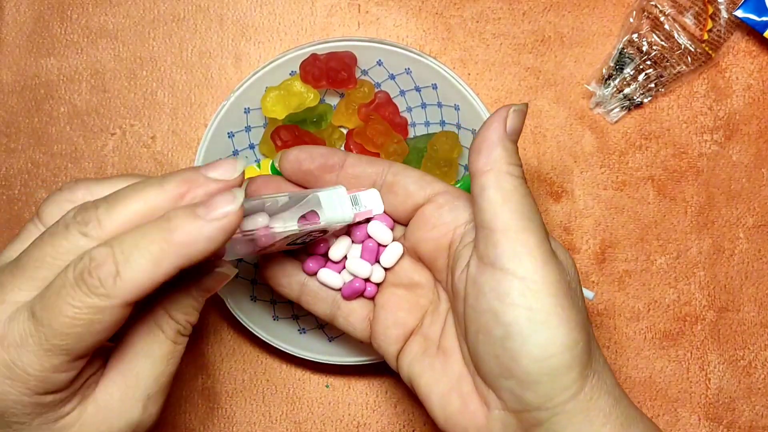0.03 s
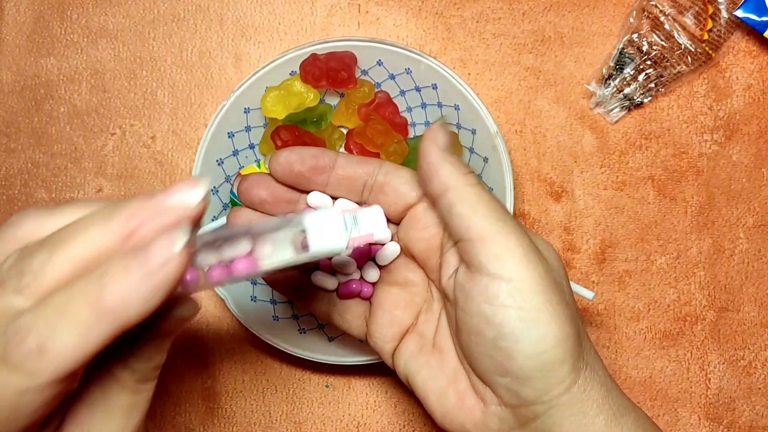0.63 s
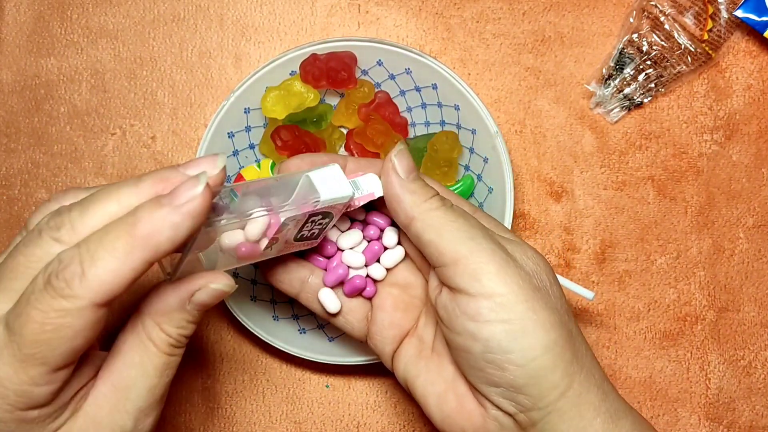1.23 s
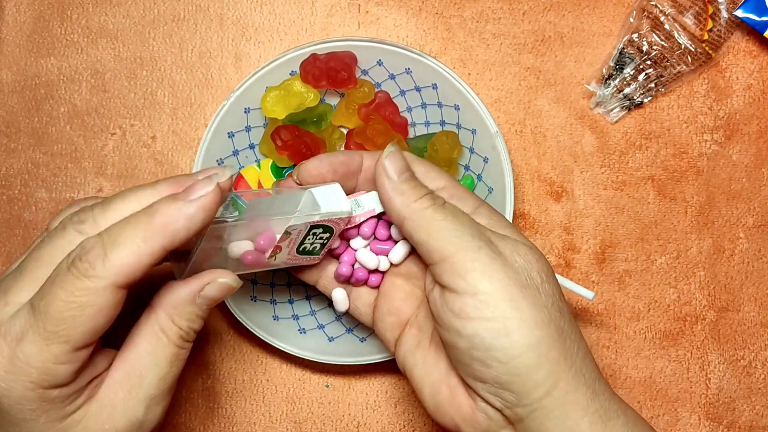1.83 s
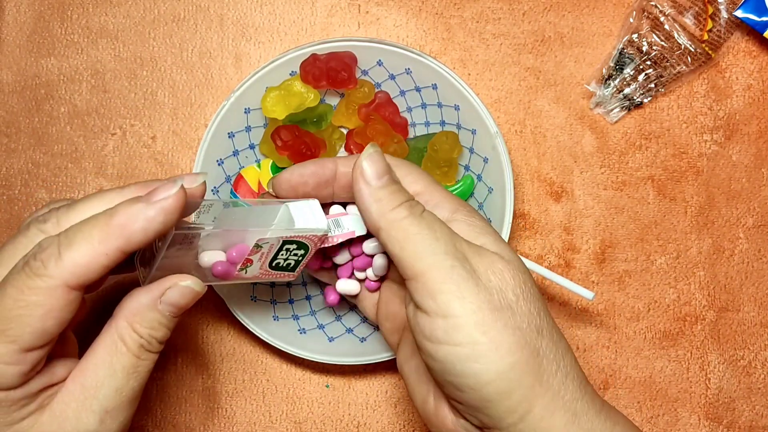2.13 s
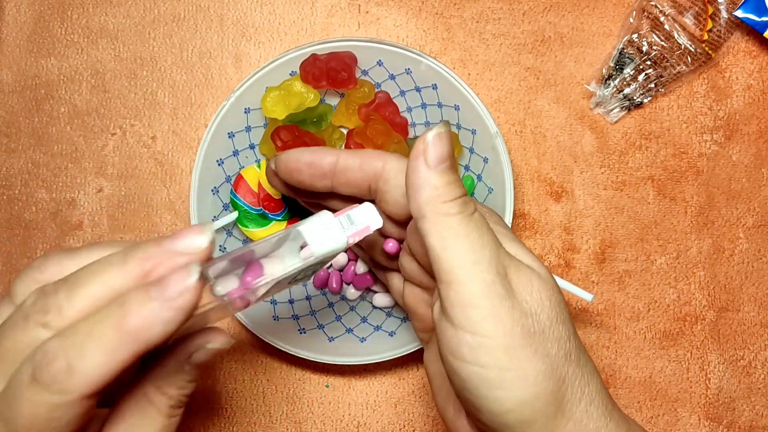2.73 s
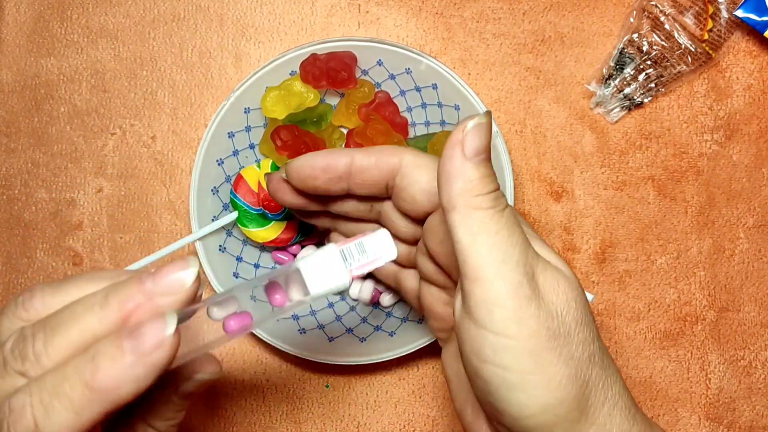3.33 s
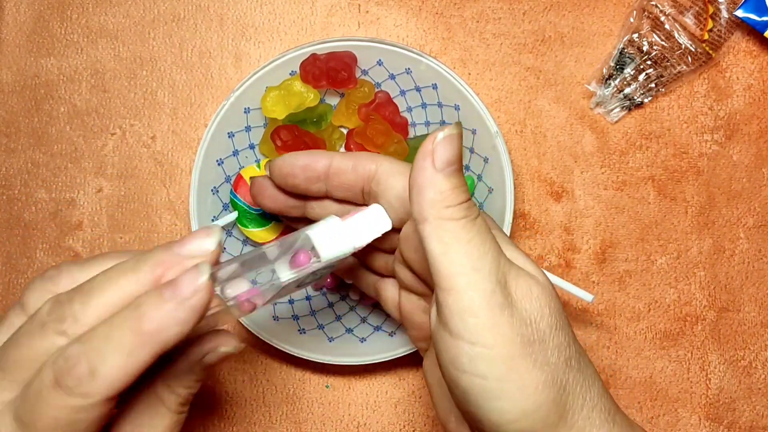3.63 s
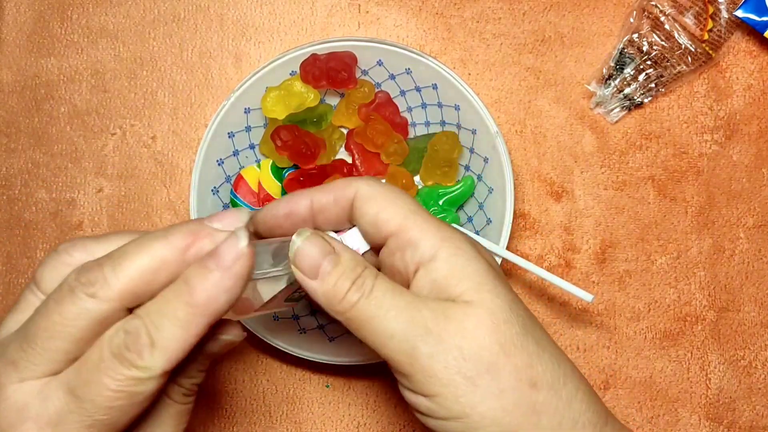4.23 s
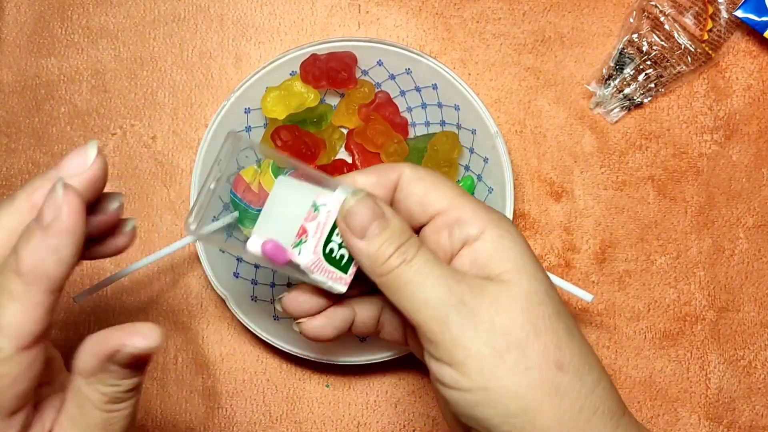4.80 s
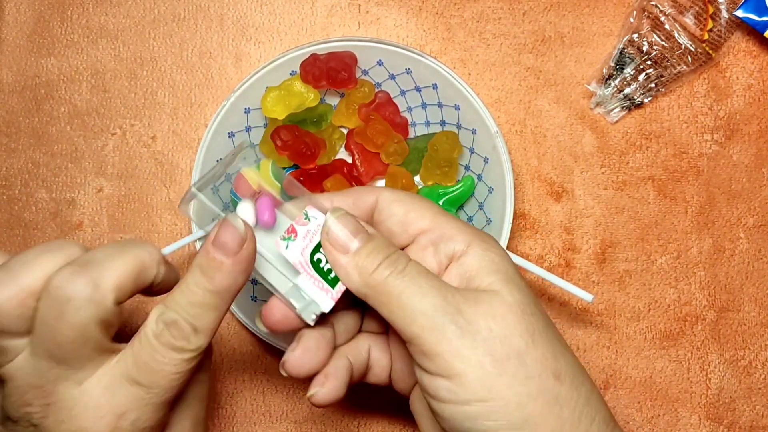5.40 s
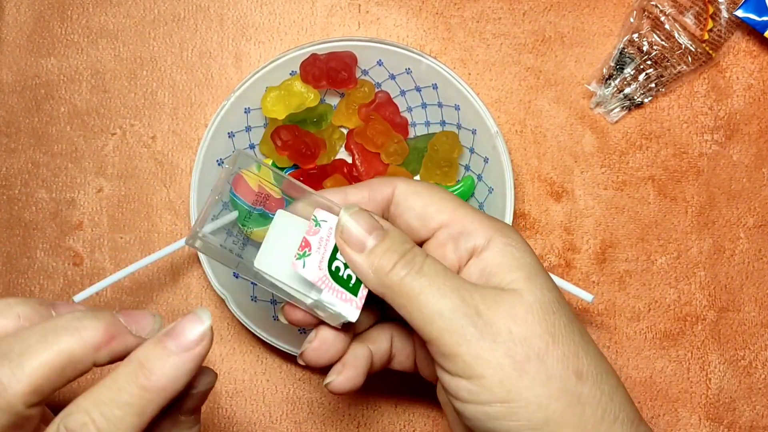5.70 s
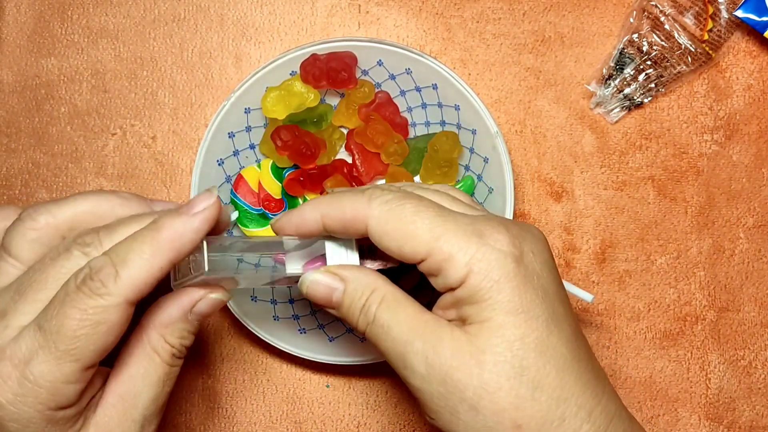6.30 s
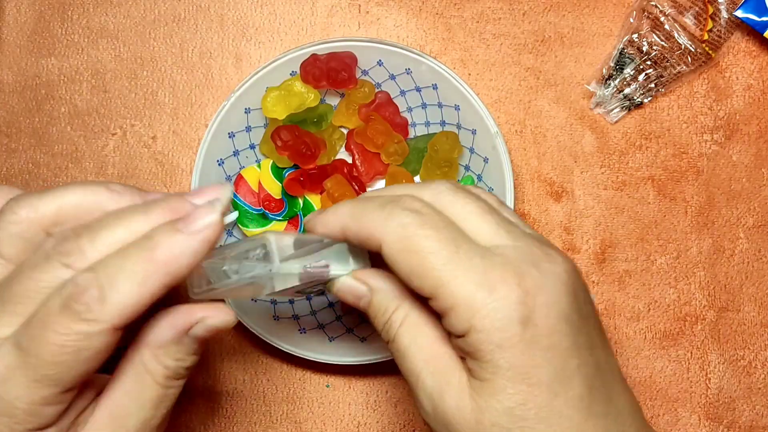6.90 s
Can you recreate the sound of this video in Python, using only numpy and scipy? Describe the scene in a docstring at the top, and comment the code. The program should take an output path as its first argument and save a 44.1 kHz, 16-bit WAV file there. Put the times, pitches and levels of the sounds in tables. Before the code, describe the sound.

For the first two seconds, small hard candies click and rattle in a thin plastic box, shaken in uneven bursts with hollow knocks and a few light, dry ticks. At about 2 seconds, candies start landing on a china plate, each with a bright tick and a very short ring. They thicken into a tumbling pour from 2.3 seconds that thins out by 2.9. From 3 to 4.7 seconds, more rattles and knocks in the box alternate with single drops on the plate. After a lull with one faint click and soft finger bumps, a sharp hollow knock comes at 5.5 seconds, followed by lighter rattling that fades by 6.4. Around 6.6 seconds, a last candy hits the plate and bounces with quick, softer ticks. The sound is close, bright and in stereo, in a small quiet room with faint hiss and hum.

```python
"""Candies from box to plate

Small hard candies are shaken from a thin plastic box into a palm, then poured onto a china plate.
In the box each clicks, bounces and knocks the hollow shell; on the plate they tick and ring the china.
The last few drop one by one. Close stereo microphone with a bright top, small quiet room."""
import sys
import numpy as np
from scipy import signal
from scipy.fft import rfft, irfft
from scipy.io import wavfile
from scipy.ndimage import uniform_filter1d

SR = 44100
rng = np.random.default_rng(int(sys.argv[2]) if len(sys.argv) > 2 else 0)


def int16_out(signal):
    """Quantize to a 16-bit WAV file."""
    q = np.round(np.clip(np.atleast_2d(signal).T, -1, 1) * 32767)
    wavfile.write(sys.argv[1], SR, q.astype(np.int16))


N = 315315
HIT_SAMPLES, ATTACK_SAMPLES = 4096, 265
TIME_S, AGE_S = np.arange(N) / SR, np.arange(HIT_SAMPLES) / SR
BOX_PAN_DB, PLATE_PAN_DB, PAN_VARY_DB = 0.5, -2.5, 1.5  # left minus right


def undb(db):
    """Decibels to gain."""
    return 10 ** (np.asarray(db) / 20)


def decay(t60_s):
    """Exponential decay, one hit long."""
    return np.exp(-np.log(1000) * AGE_S / t60_s)


def unit_rms(x, samples=None):
    """Scale to rms 1 over the leading samples, by default all."""
    return x / np.sqrt(np.mean(x[..., :samples] ** 2))


def tint(x, curve, size=1024):
    """Minimum-phase filter through (freq_hz, gain_db) points."""
    hz, db = np.transpose(curve)
    grid_hz = np.maximum(np.arange(size // 2 + 1) * SR / size, 1)
    gain = undb(np.interp(np.log(grid_hz), np.log(hz), db))
    cepstrum = irfft(np.log(gain))
    cepstrum[1:size // 2] *= 2
    cepstrum[size // 2 + 1:] = 0
    response = irfft(np.exp(rfft(cepstrum)))
    return signal.fftconvolve(x, response[None], axes=1)[:, :x.shape[1]]


def stereo_noise(samples, width):
    """Common noise plus each side's own, weighted by width."""
    noise = rng.standard_normal((3, samples))
    return noise[0] + width * noise[1:]


def add(out, start_s, sound):
    """Mix a sound in at start_s."""
    start = max(int(start_s * SR), 0)
    out[:, start:start + sound.shape[1]] += sound[:, :max(out.shape[1] - start, 0)]


def pan(sound, pan_db, lag_samples=2):
    """Treble beams towards one capsule; the hands are slightly right, so the left lags."""
    gains = unit_rms(undb(np.array([[1], [-1]]) * np.clip(pan_db, -10, 10) / 2))
    left, right = sound * gains
    return np.array([np.roll(left, lag_samples), right])


def contact(spectrum, t60_s, width=0.89, vary_db=3, rise_s=0.00096):
    """Dense, heavily damped resonances, coloured anew by each spot struck."""
    colour = [(hz, db + vary_db * rng.standard_normal()) for hz, db in spectrum]
    burst = stereo_noise(HIT_SAMPLES, width) * decay(t60_s) * (1 - decay(rise_s))
    return tint(burst, colour)


def ring(modes, vary_db, detune, phase_vary_rad):
    """Modes whose shares depend on where the blow lands and which way they radiate."""
    out = 0
    for hz, db, t60_s in modes:
        share, shift, left, right = rng.standard_normal(4)
        phase = 2 * np.pi * hz * (1 + detune * shift) * AGE_S
        phase = phase + phase_vary_rad * np.array([[left], [right]])
        gain = rng.choice([-1, 1]) * undb(db + vary_db * share)
        out = out + gain * np.sin(phase) * decay(t60_s)
    return out * (1 - decay(0.0039))


def bounces(spacing_s, loss_db, count):
    """An oval candy lands, then rebounds more softly: (delay_s, gain) per touch."""
    delays_s = np.cumsum(spacing_s * rng.uniform(.3, 1.3, count))
    gains = undb(loss_db * (1 + np.arange(count) / 2)) * rng.uniform(0.27, 1.6, count)
    return [(0.000042, 1)] + list(zip(delays_s, gains))


def strike(sound, touches):
    """A response repeated at each touch; attack rms 1."""
    out = np.zeros((2, HIT_SAMPLES))
    for delay_s, gain in touches:
        add(out, delay_s, gain * sound)
    return unit_rms(out, ATTACK_SAMPLES)


def impacts(rate_per_s, spread_db):
    """Random impulses of unequal size, slightly different on each side."""
    size = undb(spread_db * np.minimum(rng.exponential(size=N), 3))
    return (rng.random(N) < rate_per_s / SR) * size * stereo_noise(N, 0.51)


# Noise floor: freq_hz, gain_db
FLOOR_SPECTRUM = [(20, 8), (55, 0.5), (95, -4.5), (140, -6), (200, -10.5), (400, -13), (1000, -19.5),
                  (2500, -24), (6000, -25.5), (9500, -19.5), (14000, -29.5)]
# Room hum: pitch_hz, level_db
HUM_TONES = [(49, -66), (129, -70), (344.5, -76)]

def background(floor_db=-56):
    """Low room rumble, microphone hiss and a faint hum."""
    floor = unit_rms(tint(stereo_noise(N, 1.0), FLOOR_SPECTRUM, size=8192))
    hum = sum(undb(db) * np.sqrt(2) * np.sin(2 * np.pi * hz * TIME_S) for hz, db in HUM_TONES)
    return undb(floor_db) * floor + hum


def room(x, t60_s=0.14, tail_db=-12.5, echo_s=0.008, echo_db=-21.5):
    """Direct sound, one near reflection and a short diffuse tail."""
    age_s = TIME_S[:2 * HIT_SAMPLES]
    envelope = np.exp(-np.log(1000) * age_s / t60_s) * np.minimum(age_s / 0.012, 1)
    tail = stereo_noise(len(age_s), 0.69) * envelope
    response = undb(tail_db) * tail / np.sqrt(np.sum(tail ** 2) / 2)
    echo = stereo_noise(HIT_SAMPLES, 0.62) * decay(0.018)
    add(response, echo_s, undb(echo_db) * echo / np.sqrt(np.sum(echo ** 2) / 2))
    return x + signal.fftconvolve(x, response, axes=1)[:, :N]


# Fingertip thud: freq_hz, gain_db
THUD_SPECTRUM = [(120, -10.5), (400, -10), (850, 0), (1300, -15), (2200, -29.5), (12000, -17.5)]
# Bumps on the box: start_s, level_db
FINGER_TAPS = [(5.221, -39), (5.461, -29)]
# Slides on the plastic: middle_s, length_s, centre_hz, level_db
FINGER_RUBS = [(4.326, 0.04, 9760, -49.5), (4.389, 0.035, 790, -56)]

def fingers():
    """Fingertips bump the box dully or rub softly along it."""
    out = np.zeros((2, N))
    for start_s, db in FINGER_TAPS:
        thud = contact(THUD_SPECTRUM, t60_s=0.014, width=0.32, vary_db=0)
        add(out, start_s, undb(db) * unit_rms(thud, ATTACK_SAMPLES))
    for middle_s, length_s, hz, db in FINGER_RUBS:
        friction = unit_rms(tint(stereo_noise(N, 1.0), [(hz / 2, -18), (hz, 0), (hz * 2, -18)]))
        swell = np.exp(-(2 * (TIME_S - middle_s) / length_s) ** 2)
        out += undb(db) * friction * swell
    return out


# Hard tick: freq_hz, gain_db
TICK_SPECTRUM = [(500, -47.5), (1600, -21.5), (4500, -21), (6000, -9), (7200, -14), (9000, 4), (11500, 2),
                 (14000, -7.5)]

def candy_tick(t60_s, vary_db=3):
    """A candy meets a hard surface: a bright tick."""
    return contact(TICK_SPECTRUM, t60_s, vary_db=vary_db)


# Light candy ticks: start_s, level_db
LIGHT_TICKS = [(1.0605, -25.5), (1.4238, -29.5), (1.441, -27), (1.6823, -25.5), (1.8276, -19),
               (1.9123, -37.5), (2.091, -36), (3.8884, -25), (3.975, -25), (4.542, -25.5), (4.6187, -21.5),
               (4.738, -26), (6.6367, -26.5)]

def light_ticks():
    """Light dry candy ticks: on each other, on the box, or rebounding on the plate."""
    out = np.zeros((2, N))
    for start_s, db in LIGHT_TICKS:
        tick = candy_tick(t60_s=0.048)
        touches = bounces(spacing_s=0.004, loss_db=-17, count=3)
        add(out, start_s, undb(db) * strike(tick, touches))
    return out


# China resonances: pitch_hz, gain_db, unladen_t60_s
PLATE_MODES = [(1770, -30, .04), (3020, -25, .07), (3520, -25, .05), (4510, -28, .13), (5660, -15, .05),
               (6240, -21, .06), (8265, -11, .08), (8930, 0, .055), (9820, -9, .07), (10490, -8, .09),
               (10900, -9, .05), (11615, -2, .075), (12900, -8, .05), (13720, -9, .075)]

def china_ring(detune, damped_above_hz=4500, halvings_per_octave=0.51):
    """The plate rings; candies lying on it cut its high modes short."""
    modes = [(hz, db, t60_s * min(damped_above_hz / hz, 1) ** halvings_per_octave)
             for hz, db, t60_s in PLATE_MODES]
    return ring(modes, vary_db=1.0, detune=detune, phase_vary_rad=1.0)


# Single landings: start_s, level_db
PLATE_DROPS = [(2.0073, -11.5), (2.0565, -13.5), (2.104, -12), (2.1351, -18), (2.203, -13), (2.2496, -11),
               (2.286, -13), (2.3032, -13), (2.344, -19), (2.3678, -15.5), (2.5687, -14.5), (2.728, -15),
               (2.7726, -16.5), (3.1064, -14.5), (3.1756, -22), (3.212, -15), (3.4494, -11.5),
               (3.4695, -15), (3.771, -12), (3.8351, -14), (3.9176, -14.5), (4.463, -11), (4.558, -15),
               (6.5963, -13.5), (6.66, -16.5), (6.6825, -23.5), (6.7057, -19), (6.727, -28),
               (6.7493, -25.5)]

def plate_drops(ring_db=-3, ring_vary_db=4.5):
    """Tick, ring and soft rebounds; the ring varies as a candy meets bare china or other candies."""
    out = np.zeros((2, N))
    for start_s, db in PLATE_DROPS:
        spot, side = rng.standard_normal(2)
        tick = unit_rms(candy_tick(t60_s=0.02, vary_db=4.5), ATTACK_SAMPLES)
        chime = unit_rms(china_ring(detune=0.0022), ATTACK_SAMPLES)
        touches = bounces(spacing_s=.0075, loss_db=-11.5, count=3)
        landing = strike(tick + undb(ring_db + ring_vary_db * spot) * chime, touches)
        add(out, start_s, undb(db) * pan(landing, PLATE_PAN_DB + PAN_VARY_DB * side))
    return out


def pour_flow(start_s=2.31, rise_s=.04, thin_after_s=0.27, thin_db_per_s=-51, end_s=2.9, fall_s=.05):
    """Flow of the handful, 0-1: swells, holds, thins out, stops."""
    age_s = TIME_S - start_s
    moving = np.clip(age_s / rise_s, 0, 1) * np.clip((end_s - TIME_S) / fall_s, 0, 1)
    return moving * undb(thin_db_per_s * np.maximum(age_s - thin_after_s, 0))


def pour(level_db=-17.5, ring_db=1, spots=8, spot_rate_per_s=70):
    """Candies tumble over the plate; contacts grow fewer and softer as the flow dies."""
    flow, out = pour_flow(), np.zeros((2, N))
    for _ in range(spots):
        tick = unit_rms(candy_tick(t60_s=0.038))
        chime = undb(ring_db) * unit_rms(china_ring(detune=0.0016))
        landings = impacts(spot_rate_per_s * flow, spread_db=2.0)
        out += signal.oaconvolve(landings, tick + chime, axes=1)[:, :N]
    flow_rms = np.sqrt(np.mean(flow ** 2))
    return undb(level_db) * flow_rms * unit_rms(out * np.sqrt(flow))


# Shell resonances: pitch_hz, gain_db, t60_s
SHELL_MODES = [(1102, -12, 0.0073), (1167, -4.5, 0.026), (1279, 1, 0.02), (1430, 1, 0.011),
               (1650, -8, 0.012), (1908, -3, 0.01), (3280, -10.5, 0.034)]
# Air in the box, ringing lower as it empties: time_s, pitch_hz
CAVITY_PITCH = [(.8, 670), (1.5, 597), (3.6, 601), (5.5, 552)]

def shell_knock(time_s, vary_db=2.5, cavity_db=-11.5, cavity_t60_s=0.033):
    """Hollow knock of shell and enclosed air; so small a body radiates no bass."""
    cavity_hz = np.interp(time_s, *np.transpose(CAVITY_PITCH))
    modes = SHELL_MODES + [(cavity_hz, cavity_db, cavity_t60_s)]
    knock = ring(modes, vary_db, detune=0.023, phase_vary_rad=0.15)
    return signal.sosfilt(signal.butter(3, 470, "high", fs=SR, output="sos"), knock)


# Candy click and plastic wall clack: freq_hz, gain_db
CLICK_SPECTRUM = [(2000, -41.5), (5500, -15.5), (7000, -6.5), (8700, 2), (11000, -5.5), (12500, -9),
                  (14000, -12.5)]
CLACK_SPECTRUM = [(900, -38.5), (2200, -5), (3400, -1.5), (4800, 0), (6300, -3), (8500, -22)]

def box_blow(start_s, click_db, knock_db, clack_re_click_db=-9.5, clack_vary_db=0.96):
    """One blow clicks the candy, clacks the stiff wall and knocks the hollow shell."""
    wall, side = rng.standard_normal(2)
    touches = bounces(spacing_s=.0035, loss_db=-8.0, count=4)
    click = strike(contact(CLICK_SPECTRUM, t60_s=0.018, vary_db=2.5), touches)
    clack = strike(contact(CLACK_SPECTRUM, t60_s=0.023, width=0.66), touches)
    clack *= undb(clack_re_click_db + clack_vary_db * wall)
    snap = undb(click_db) * (click + clack)
    knock = undb(knock_db) * strike(shell_knock(start_s), touches)
    return pan(snap, BOX_PAN_DB + PAN_VARY_DB * side) + pan(knock, 0)


def jostling(blows, gain_db=-19, clack_db=-8, knock_db=-9, settle_t60_s=0.27, swell_s=0.034):
    """Each blow stirs the other candies, which scrape and nudge until they settle."""
    pushes = np.zeros(N)
    for start_s, click_db, _ in blows:
        pushes[int(start_s * SR)] += undb(click_db) ** 2
    retention = np.exp(-2 * np.log(1000) / (settle_t60_s * SR))
    energy = signal.lfilter([1], [1, -retention], pushes)
    stir = np.sqrt(np.abs(uniform_filter1d(energy, int(swell_s * SR))))
    nudges = impacts(rate_per_s=300, spread_db=8.5)
    knock = signal.fftconvolve(nudges, shell_knock(time_s=2.8, vary_db=0.5), axes=1)[:, :N]
    grit = stereo_noise(HIT_SAMPLES, 1.0) * decay(0.0081)
    scrape = signal.fftconvolve(nudges, grit, axes=1)[:, :N]
    click = unit_rms(tint(scrape, CLICK_SPECTRUM))
    clack = unit_rms(tint(scrape, CLACK_SPECTRUM))
    rattle = click + undb(clack_db) * clack + undb(knock_db) * unit_rms(knock)
    return pan(undb(gain_db) * stir * rattle, BOX_PAN_DB)


# Shakes sliding candies against the lid: start_s, length_s, knock_db
SHAKES = [(0.284, .032, -37), (0.432, 0.046, -35.5), (0.596, 0.023, -31.5), (0.688, 0.075, -36),
          (0.764, 0.02, -30.5), (1.164, 0.077, -45), (1.315, .045, -43.5), (1.526, 0.1, -34.5),
          (2.937, 0.038, -29), (3.112, 0.041, -44.5), (3.615, .08, -42.5), (5.529, 0.063, -35),
          (5.648, 0.06, -36), (5.967, 0.055, -49.5)]

def shake_blows(count=5, lead_s=.024, lead_db=-9.5, vary_db=2.5, jitter=.2, click_re_knock_db=3.5):
    """One candy runs ahead, then a few hit the lid in turn: (start_s, click_db, knock_db) per blow."""
    blows = []
    for start_s, length_s, db in SHAKES:
        lateness, softness = rng.standard_normal((2, count))
        turn = np.arange(count) + jitter * lateness * (np.arange(count) > 0)
        times_s = np.append(start_s - lead_s, start_s + length_s * turn / (count - 1))
        knocks_db = db + np.append(lead_db, -vary_db * softness)
        blows += zip(times_s, knocks_db + click_re_knock_db, knocks_db)
    return blows


# Single hard blows, hollower near the lid: start_s, click_db, knock_db
BOX_HITS = [(0.0928, -14, -40.5), (0.1045, -21, -33), (0.2436, -22, -34), (0.2748, -16, -38),
            (0.7213, -14, -30), (0.7845, -14, -21.5), (0.848, -15, -37), (0.9696, -25, -46.5),
            (1.1525, -11.5, -28), (1.1794, -15.5, -43), (1.189, -14, -29), (1.2352, -23.5, -46),
            (1.28, -25.5, -50), (1.5309, -22.5, -22.5), (1.5617, -48, -29), (1.5845, -23, -22.5),
            (1.6065, -13.5, -21.5), (1.65, -28, -37.5), (1.7092, -26, -43), (1.7743, -31, -40),
            (1.849, -21.5, -45), (2.9563, -16, -29.5), (3.0813, -32, -31), (3.1368, -20, -28.5),
            (3.2894, -27, -35), (3.3028, -16.5, -45), (3.4987, -18, -32), (3.5362, -24.5, -38.5),
            (3.579, -24, -24.5), (3.6156, -23, -25), (3.6311, -28.5, -24), (3.6619, -24, -27),
            (3.6942, -19, -36), (3.9998, -17, -36), (4.1129, -28, -44), (4.15, -21, -37.5),
            (4.999, -29, -48), (5.5309, -16.5, -16), (5.6726, -14, -26), (5.7365, -29.5, -40.5),
            (5.7823, -23.5, -42), (5.8119, -27.5, -43.5), (5.9731, -27, -54), (6.027, -21.5, -44),
            (6.0624, -27.5, -62), (6.1041, -18, -55), (6.3443, -35.5, -70), (6.4082, -34.5, -72)]

def box():
    """Candies hit the box, singly and in shakes, and set the rest jostling."""
    out, blows = np.zeros((2, N)), BOX_HITS + shake_blows()
    for start_s, click_db, knock_db in blows:
        add(out, start_s, box_blow(start_s, click_db, knock_db))
    return out + jostling(blows)


def scene():
    """Box, plate, candies and fingers in the room."""
    return room(box() + plate_drops() + pour() + light_ticks() + fingers()) + background()


# Capsules peaking at different pitches: freq_hz, left_minus_right_db
CAPSULE_BALANCE = [(3000, 0), (8000, -7.5), (9500, -7), (11000, 13.5), (14000, 0.5)]

def record(dry, ceiling=.9, cutoff_hz=14000):
    """The capsules colour the treble; the recorder clips the highest peaks and cuts the top."""
    left = tint(dry[:1], [(hz, db / 2) for hz, db in CAPSULE_BALANCE])
    right = tint(dry[1:], [(hz, -db / 2) for hz, db in CAPSULE_BALANCE])
    clipped = np.clip(np.vstack([left, right]), -ceiling, ceiling)
    return signal.sosfilt(signal.ellip(7, .3, 65, cutoff_hz, fs=SR, output="sos"), clipped)


dry = scene()
out = record(dry)
int16_out(out)
```